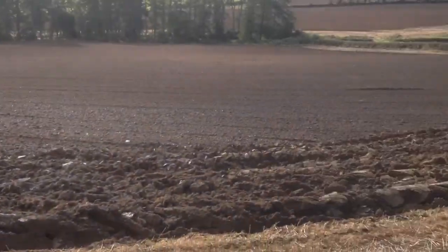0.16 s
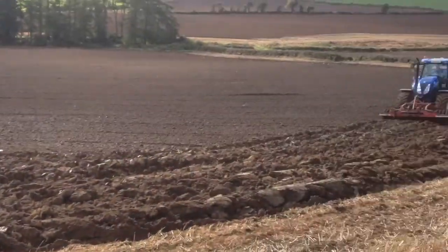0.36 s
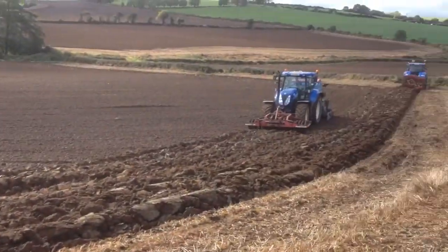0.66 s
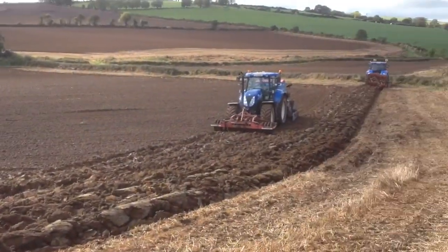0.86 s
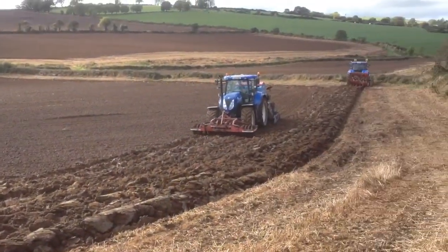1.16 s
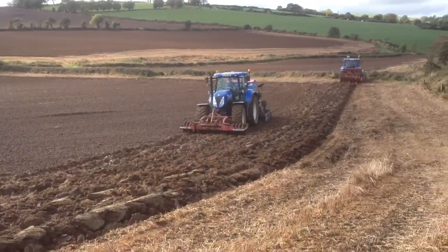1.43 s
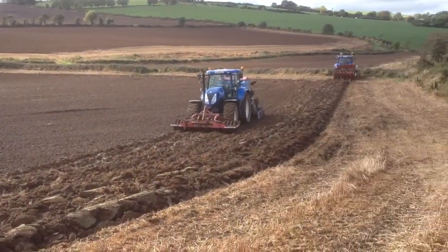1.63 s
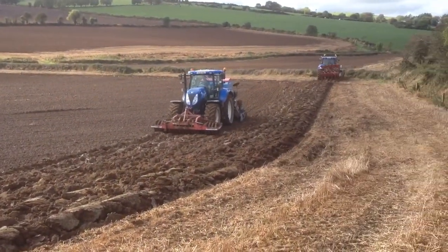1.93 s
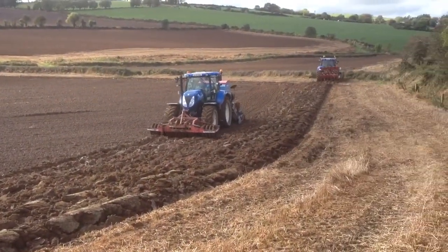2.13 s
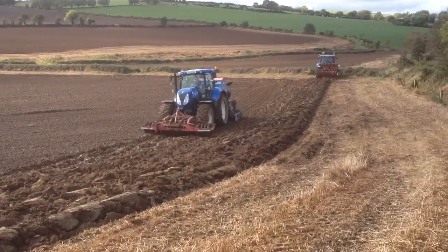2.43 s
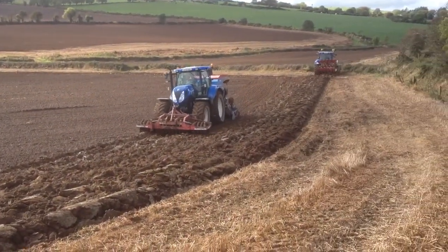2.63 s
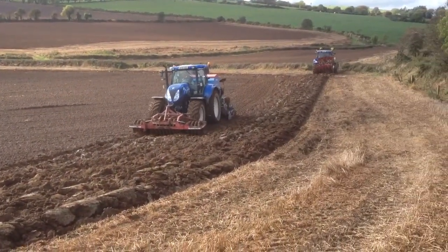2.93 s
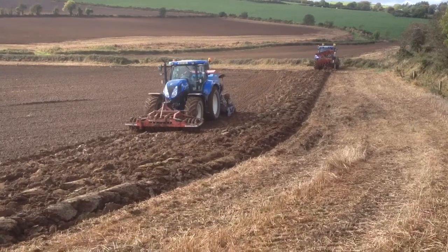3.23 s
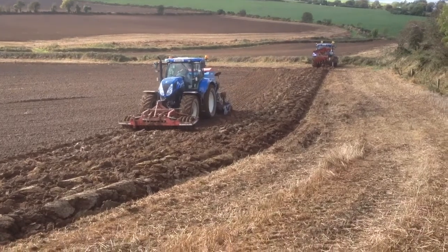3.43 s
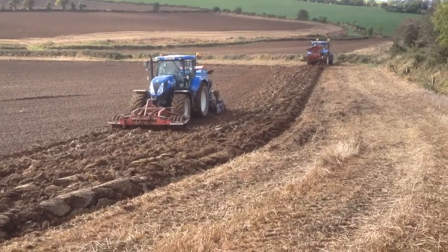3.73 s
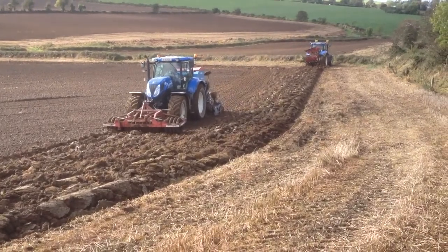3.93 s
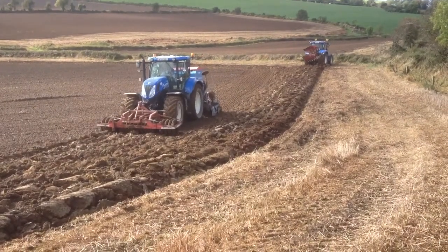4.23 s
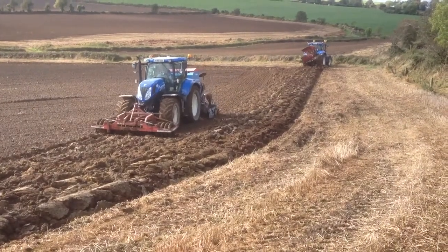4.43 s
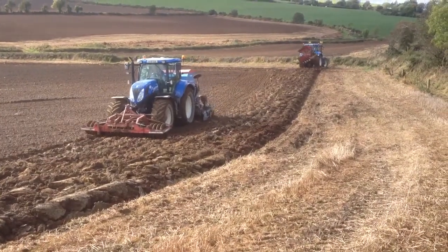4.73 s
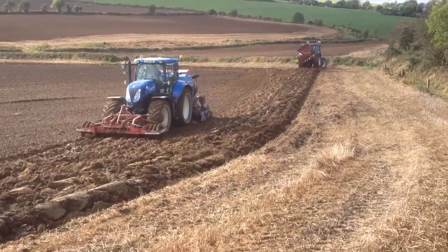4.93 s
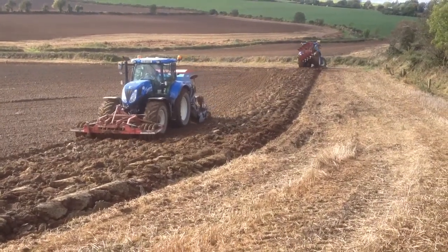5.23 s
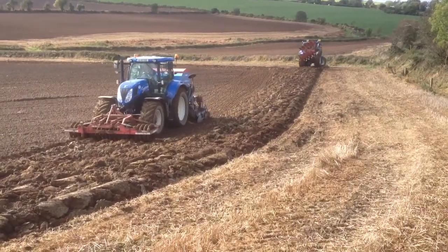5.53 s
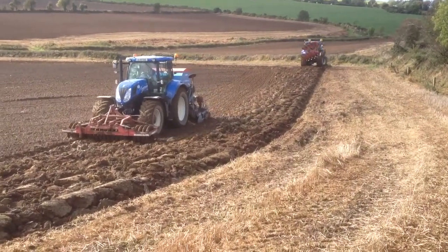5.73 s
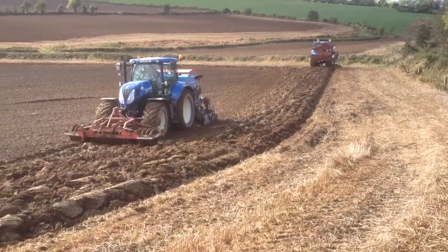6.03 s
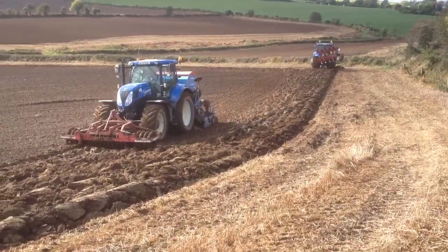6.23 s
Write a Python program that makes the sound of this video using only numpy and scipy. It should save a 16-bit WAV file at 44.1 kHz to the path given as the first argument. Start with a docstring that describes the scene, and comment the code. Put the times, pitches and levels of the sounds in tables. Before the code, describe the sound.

A tractor drones and clatters as it slowly approaches, with a steady fan whine and wind gusts buffeting the microphone.

```python
"""A six-cylinder tractor, some way off and slowly nearing, pulls a harrow and seed drill over a field.
Its firings excite a drone, a thudding block and a diesel clatter, sagging a little in pitch under load.
The drill's fan whines on steadily at its blade rate, and stones tick on the harrow's tines.
A faint, narrow band of noise near 1.4 kHz fades over the first three seconds.
Turbulent gusts buffet the microphone, and something scuffs briefly beside it."""
import sys
import numpy as np
from scipy import signal
from scipy.fft import rfft, irfft, next_fast_len
from scipy.io import wavfile
from scipy.ndimage import map_coordinates

SR = 44100
rng = np.random.default_rng(int(sys.argv[2]) if len(sys.argv) > 2 else 0)


def master(y):
    """Save y as 16-bit WAV."""
    cut = np.clip(np.atleast_2d(y).T, -1, 1)
    pcm = np.round(cut * 32767)  # scale
    wavfile.write(sys.argv[1], SR, pcm.astype(np.int16))


N = 280917

# spectra of large, middling and small eddies: (frequency [Hz], relative level [dB])
THUMP_SPECTRUM = [(5, -72.5), (20, -32), (30, -26.5), (45, -18.5), (63, -8.5), (85, -3), (105, 4.5),
                  (130, -7.5), (200, -44), (800, -120)]
RUMBLE_SPECTRUM = [(20, -120), (70, -29), (100, -11), (125, -1.5), (155, 1.5), (200, 1.5), (250, -4),
                   (330, -14.5), (500, -32), (2000, -120)]
FLUTTER_SPECTRUM = [(20, -120), (80, -30.5), (200, -1), (290, 3), (400, -3), (520, -6), (700, -14.5),
                    (1000, -22.5), (2000, -56), (6000, -120)]
# gusts: (time [s], hold [s], strength over the breeze [dB], extra flutter [dB])
GUSTS = [(0.424, 0.13, 3.5, -0.5), (.76, 0.32, 4.5, 1), (2.269, 0.57, 4.5, 1), (3.093, 0.66, 3.5, 2.5),
         (4.318, 0.47, 5, 0.5), (4.96, 0.4, 2.7, -.5), (5.88, 0.14, 2.5, -0.5), (6.17, 0.24, 6, -3.5)]
# single strong eddies: (time [s], strength over the gust [dB], extra thump [dB])
BUFFETS = [(.715, 5, -3), (.815, 2, 10), (1.11, 2, 8), (2.1, 6, 2.5), (2.285, 8, 4), (2.435, 5.5, -2),
           (2.515, 5, -1), (2.84, 8, -5), (3.228, 7, -1), (3.395, 5, 4), (3.465, 4.5, 1), (3.69, 4, 1.5),
           (4.43, 7, -5), (4.51, 6, 1), (4.68, 6.5, 2), (4.76, 3, 1.5), (4.99, 7, 4), (5.155, 5.5, -6),
           (6.22, 5, -8), (6.345, 4.5, -2)]
# spectra of self-noise, the 1.4 kHz band, a scuff, a struck tine: (frequency [Hz], relative level [dB])
HISS_SPECTRUM = [(100, 6), (2500, 4), (3500, 2.5), (5000, 2), (7000, -2), (8500, -5), (10000, -7),
                 (11500, -4), (13000, -1.5), (14500, 3.5), (15300, -1.2)]
MID_BAND_SPECTRUM = [(200, -120), (900, -22), (1150, -4.5), (1350, 0), (1520, -3.5), (1750, -15),
                     (3000, -35), (8000, -120)]
SCUFF_SPECTRUM = [(20, -120), (150, -10), (500, 7), (900, 3), (1350, 3), (2000, -5), (2700, -17),
                  (3600, -23), (4500, -34.5), (12000, -76)]
TINE_SPECTRUM = [(100, -120), (1200, -19), (1900, 3.5), (2600, 1.5), (3300, -13), (4700, -8.5), (5600, -24),
                 (12000, -79)]
# nearby scuffs, and stones on the tines: (time [s], level [dB], time to decay by 60 dB [s])
SCUFFS = [(0.008, -56, 0.26), (0.079, -42.5, 0.08), (0.0944, -41.5, .06), (0.121, -43, .05),
          (0.1305, -39, 0.044)]
STONES = [(0.6828, -63, 0.052), (2.709, -61, .05), (2.7605, -57.5, 0.054), (5.99, -64, 0.25)]
# the fan's blade tone, swelling as it nears: (time [s], level [dB])
BLADE_LEVEL = [(0, -59.5), (1.7, -55), (2.25, -50.5), (3.3, -49.5), (4.5, -47), (5.3, -49), (6.37, -50)]
# fan harmonics 2 to 4: (mean level relative to the blade tone [dB])
FAN_OVERTONE_DB = [-11, -27.5, -29]
# engine speed under load: (time [s], firing rate [Hz])
FIRING_RATE = [(0, 108.5), (2.7, 106), (3.6, 109.4), (4.1, 104), (4.7, 98.7), (5.3, 93.7), (6.37, 100.6)]
# engine tones, in parallel lists: (multiple of the crank rate [1]) and (relative level [dB])
ENGINE_ORDERS = [3, 6, 7, 24, 25, 30, 32, 36]
ORDER_DB = [-54, -46.5, -53, -71, -69, -75, -74, -75.5]
# spectra of the engine's block and top end: (frequency [Hz], relative level [dB])
BLOCK_SPECTRUM = [(20, -59), (60, -18), (130, 9), (250, 4.5), (450, 5), (560, -0.5), (680, -2), (850, 1.5),
                  (980, -1), (1150, -7), (1260, -6), (1380, -20), (2500, -44.5), (8000, -120)]
CLATTER_SPECTRUM = [(300, -120), (800, -24), (1200, -7.5), (1460, -1), (1560, -1.5), (1740, 3), (1930, 0),
                    (2150, -6), (2500, -12), (3200, -19), (6000, -38), (16000, -81)]


def amp(db):
    """Amplitude ratio: tenfold for every 20 dB."""
    return 10 ** (np.asarray(db) / 20)


def unit(x):
    """Normalisation to rms 1."""
    return x / np.sqrt(np.mean(x ** 2) + 1e-20)


def seconds():
    """Uniform sampling: the time of each sample."""
    return np.arange(N) / SR


def curve(rows):
    """Linear interpolation of (time, value) rows at each sample."""
    return np.interp(seconds(), *np.transpose(rows))


def wobble(rate):
    """Smooth random modulation: a spline through rate Gaussian knots a second."""
    knots = rng.standard_normal(int(N * rate / SR) + 4)
    return map_coordinates(knots, [np.arange(N) * rate / SR])


def filtered(x, response):
    """Linear filtering: the spectrum of x times a frequency response."""
    size = next_fast_len(N + SR // 2)
    return irfft(rfft(x, size) * response(np.fft.rfftfreq(size, 1 / SR)), size)[:N]


def coloured(x, spectrum):
    """Spectral shaping by (Hz, dB) points on a log-frequency axis, at rms 1."""
    f, db = np.transpose(spectrum)
    return unit(filtered(x, lambda hz: amp(np.interp(np.log(hz + 1), np.log(f), db))))


def noise(spectrum):
    """Filtered white noise of rms 1."""
    return coloured(rng.standard_normal(N), spectrum)


def mid_band(start_db=-63, fade_db_per_s=5, rest_db=-78):
    """Exponential decay: a faint, narrow band of noise near 1.4 kHz fades unevenly to a floor."""
    mid_band_db = np.maximum(start_db - fade_db_per_s * seconds(), rest_db)
    return amp(mid_band_db + 1.5 * wobble(25)) * noise(MID_BAND_SPECTRUM)


def gusts(freshen_db_per_s=0.62, sag_db_per_s=1.5, rise_s=0.093, fall_s=0.14):
    """Unsteady flow: gusts rise, sag and fall on a freshening breeze."""
    t = seconds()
    strength_db, extra_flutter_db = freshen_db_per_s * (t - t.mean()), np.zeros(N)
    for start, hold, db, flutter_db in GUSTS:
        shape = np.interp(t, [start - rise_s, start, start + hold, start + hold + fall_s], [0, 1, 1, 0])
        strength_db += shape * (db - sag_db_per_s * (t - start))
        extra_flutter_db += shape * flutter_db
    return strength_db, extra_flutter_db


def buffets(half_width_s=0.027):
    """Intermittency: each strong eddy passes as a brief bell-shaped swell."""
    times, strength_db, extra_thump_db = np.transpose(BUFFETS)
    shapes = np.exp(-((seconds() - times[:, None]) / half_width_s) ** 2)
    return strength_db @ shapes, extra_thump_db @ shapes


def wind():
    """Turbulent pressure on the microphone: large eddies thump, middling ones rumble, small flutter."""
    gust_db, extra_flutter_db = gusts()
    buffet_db, extra_thump_db = buffets()
    # each layer: its level in the breeze, plus its growth per dB of wind strength
    thump_db = -49 + 0.91 * (gust_db + buffet_db) + extra_thump_db
    rumble_db = -38 + 0.95 * (gust_db + buffet_db)
    flutter_db = -48 + 1.147 * (gust_db + 0.86 * buffet_db) + extra_flutter_db
    eddies = wobble(30)
    thump = amp(thump_db) * unit(amp(1.2 * wobble(14)) * noise(THUMP_SPECTRUM))
    rumble = amp(rumble_db) * unit(amp(1.2 * eddies) * noise(RUMBLE_SPECTRUM))
    flutter = amp(flutter_db) * unit(amp(1.7 * eddies + 1.8 * wobble(90)) * noise(FLUTTER_SPECTRUM))
    return thump + rumble + flutter


def scrapes(events, spectrum, grit_db, rise_s=0.0014):
    """Contact noise: each short, gritty touch rises fast and decays exponentially."""
    envelope = np.zeros(N)
    for start, db, t60 in events:
        age = np.maximum(seconds() - start, 0)
        envelope += amp(db - 60 * age / t60) * (1 - np.exp(-age / rise_s))
    grit = amp(grit_db * wobble(700)) * rng.standard_normal(N)
    return envelope * coloured(grit, spectrum)


def harrow():
    """Impact noise: a stone ticks on the tines now and then."""
    return scrapes(STONES, TINE_SPECTRUM, grit_db=-0.5)


def fan(blade_hz=494.3, overtone_swell_share=0.28):
    """Blade passage: the drill's fan sounds a harmonic series, each partial flickering in turbulence."""
    blade_db = curve(BLADE_LEVEL)
    overtone_db = blade_db.mean() + overtone_swell_share * (blade_db - blade_db.mean())
    phase = 2 * np.pi * np.cumsum(blade_hz + 0.7 * wobble(10)) / SR
    levels = [blade_db] + [overtone_db + db for db in FAN_OVERTONE_DB]
    whine = np.zeros(N)
    for harmonic, db in enumerate(levels, start=1):
        flicker_db = 1.1 * wobble(3.98) + 1.4 * wobble(16)
        whine += amp(db + flicker_db) * np.sqrt(2) * np.sin(harmonic * phase + 0.18 * wobble(36))
    return whine


def firings(firing_count, uneven_db=1.5, scatter_db=2.5, cylinders=6):
    """Combustion as an impulse train: each cylinder fires with its own strength."""
    at = np.flatnonzero(np.diff(np.floor(firing_count)))
    imbalance = rng.standard_normal(cylinders)[np.arange(len(at)) % cylinders]
    pulses = np.zeros(N)
    pulses[at] = amp(uneven_db * imbalance + scatter_db * rng.standard_normal(len(at)))
    return pulses


def vibration(pulses, spectrum, knock, decay_s, steady):
    """Impulse excitation: each firing gives a knock and a decaying flare over steady noise."""
    flare = unit(signal.lfilter([1], [1, -np.exp(-1 / (decay_s * SR))], pulses))
    rattle = unit((steady + flare) * rng.standard_normal(N))
    return coloured(knock * unit(pulses) + rattle, spectrum)


def exhaust(crank_turns):
    """Periodic flow: the exhaust drones at multiples of the crank rate, each tone wavering."""
    drone = np.zeros(N)
    for order, db in zip(ENGINE_ORDERS, ORDER_DB):
        level = amp(db + 2.5 * wobble(4))
        phase = 2 * np.pi * (order * crank_turns + rng.random()) + 0.02 * order * wobble(14)
        drone += level * np.sqrt(2) * np.sin(phase)
    return drone


def tractor(start_m=45.6, speed_m_per_s=2.88):
    """Spherical spreading: the engine's pressure grows as 1 / distance, its clatter a little faster."""
    firing_count = np.cumsum(curve(FIRING_RATE)) / SR
    pulses = firings(firing_count)
    drone = amp(-2) * exhaust(firing_count / 3)  # three firings per turn of the crank
    block = amp(-50) * vibration(pulses, BLOCK_SPECTRUM, knock=0.2, decay_s=0.0033, steady=1.7)
    clatter = amp(-68.5) * vibration(pulses, CLATTER_SPECTRUM, knock=0.078, decay_s=0.0083, steady=1.1)
    nearness = start_m / (start_m - speed_m_per_s * seconds())
    drift_db = 0.5 * wobble(7)  # moving air makes the far sound swell and fade
    return nearness * amp(drift_db) * (drone + block + nearness ** 0.4 * clatter)


def scene():
    """Superposition: the far machine, the faint band, the wind and the scuffs add at one microphone."""
    mix = tractor() + fan() + mid_band() + harrow() + wind()
    return (mix + scrapes(SCUFFS, SCUFF_SPECTRUM, grit_db=1.5))[None]


def record(dry):
    """Self-noise and band limiting: the electronics add hiss and pass nothing above a cutoff."""
    hiss = amp(-70.5) * noise(HISS_SPECTRUM)
    return filtered(dry[0] + hiss, lambda hz: hz < 15350)[None]


dry = scene()
out = record(dry)
master(out)
```